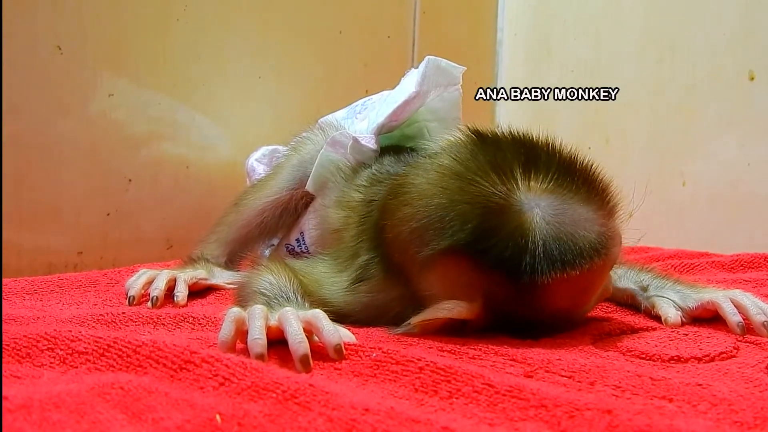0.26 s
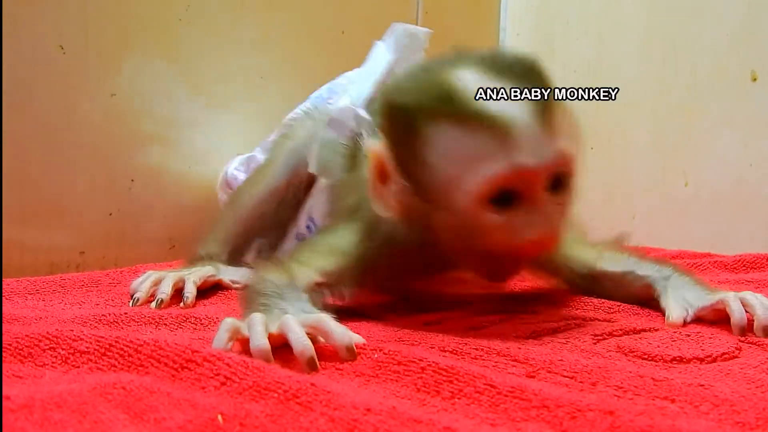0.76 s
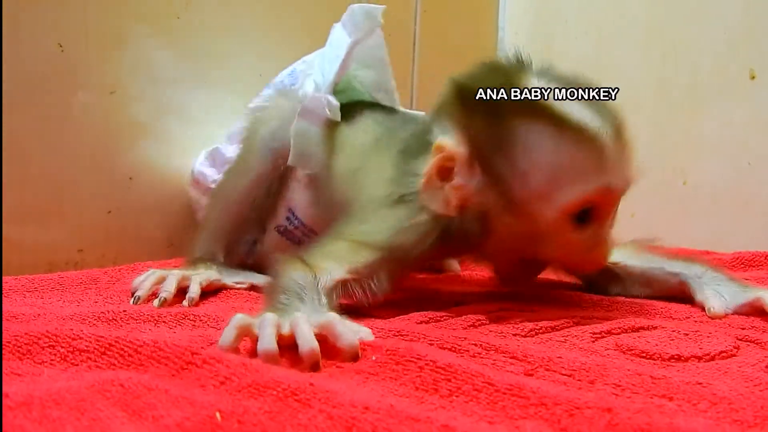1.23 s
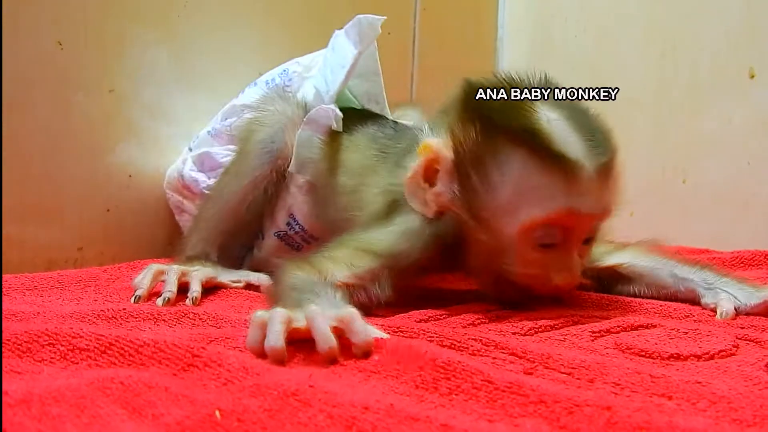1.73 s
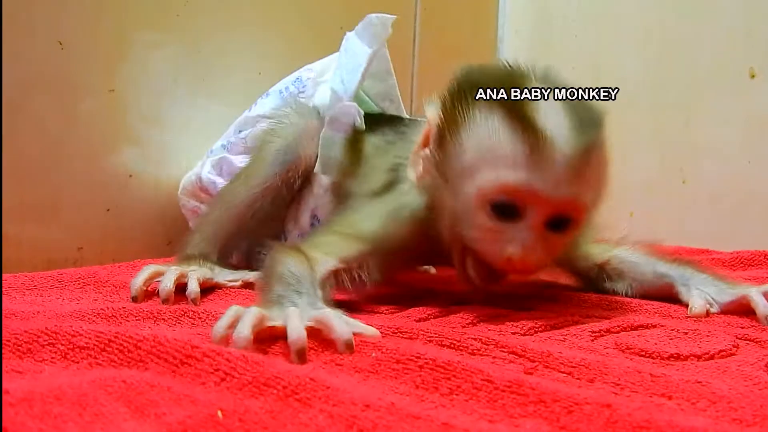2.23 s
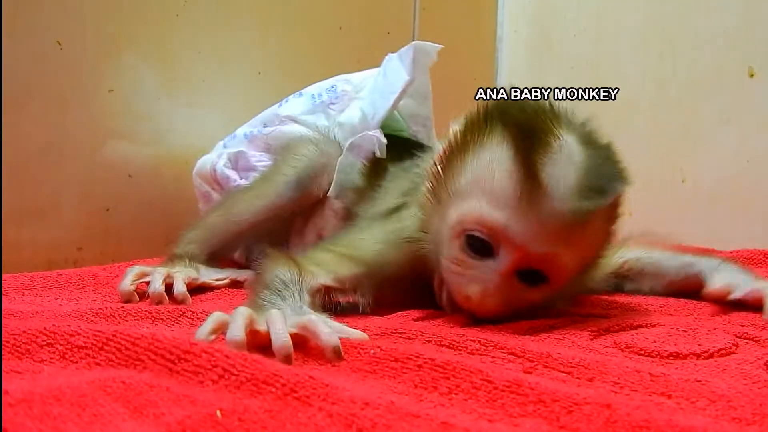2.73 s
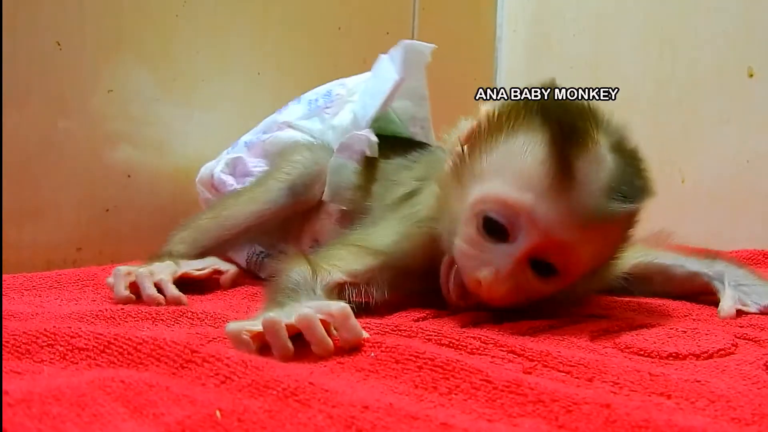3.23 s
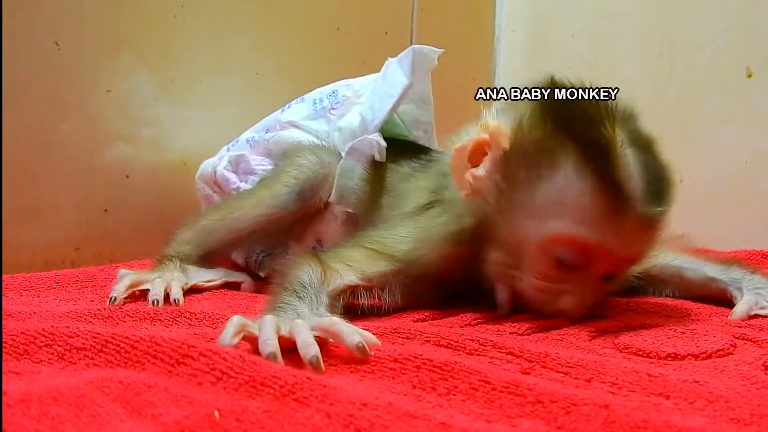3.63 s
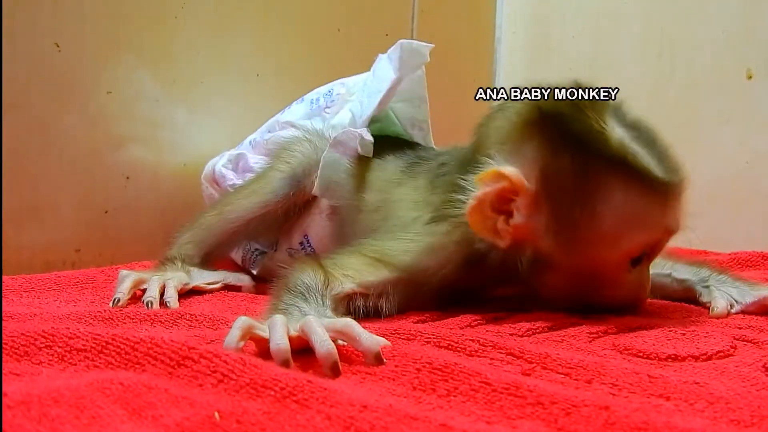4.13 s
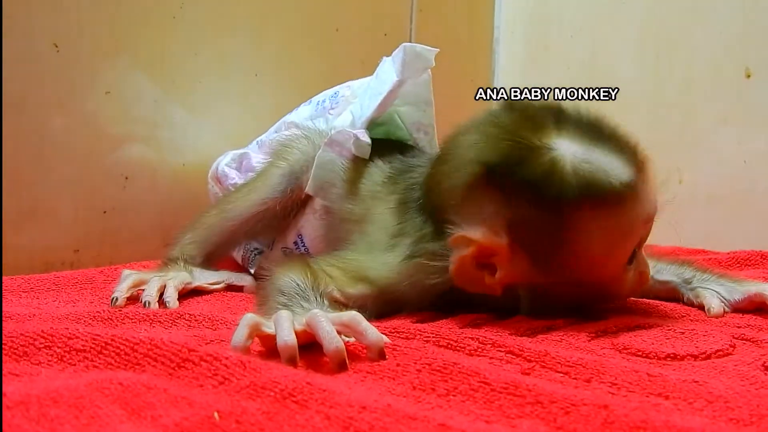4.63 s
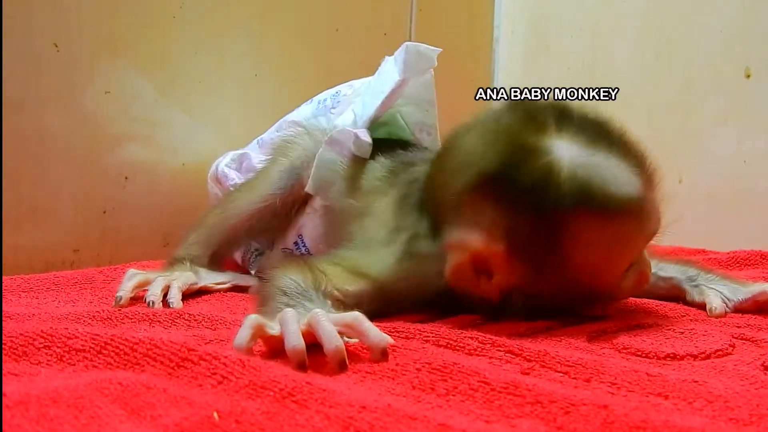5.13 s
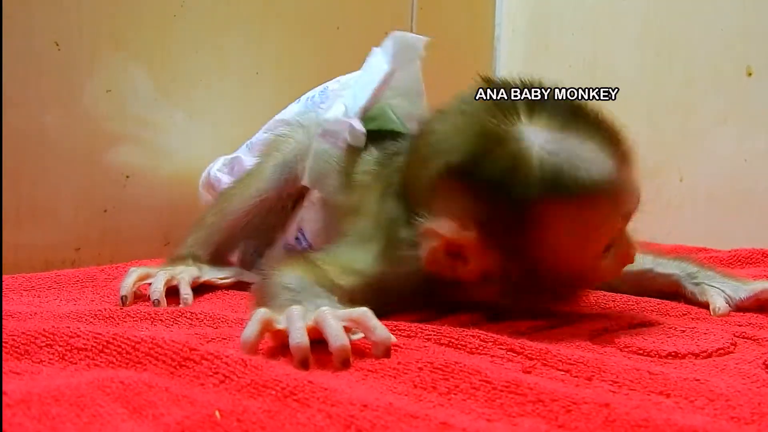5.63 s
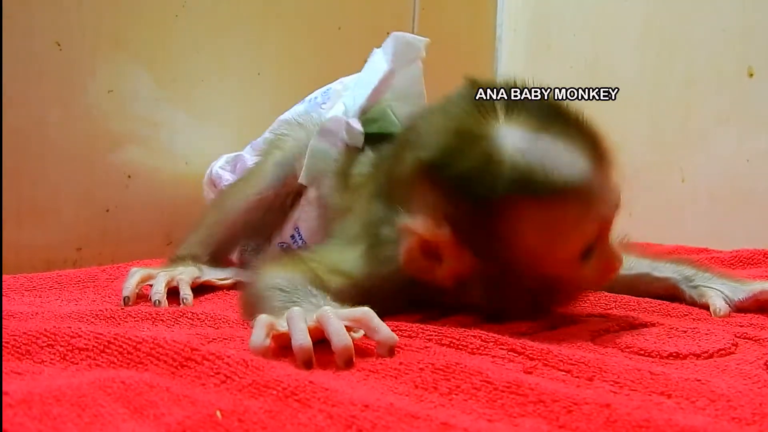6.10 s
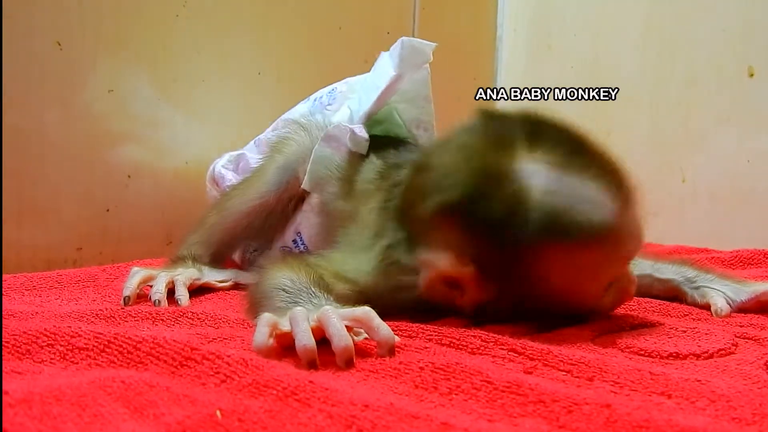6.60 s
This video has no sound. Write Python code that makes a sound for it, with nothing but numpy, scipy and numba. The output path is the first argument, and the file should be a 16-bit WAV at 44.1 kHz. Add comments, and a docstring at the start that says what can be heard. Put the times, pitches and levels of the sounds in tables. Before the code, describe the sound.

A baby monkey cries very close in a small hard-walled room. After half a second of quiet hum and hiss, eleven raspy shrieks follow with brief gaps, each starting as a dull yelp, opening into piercing treble and breaking up and down in pitch. Bright echoes fill the pauses, with faint soft bumps on padding. The microphone is near and loud peaks sound flattened.

```python
"""Screaming baby monkey

A baby monkey screams eleven times, close by, in a small hard-walled room.
Each scream starts with a dull yelp, then moves between thin upward climbs and hard pushes that sag in pitch.
Vocal fold harmonics and pulsed noise sound through the throat and through a mouth resonance that rises as it opens.
Echoes of decaying noise ring on over a low hum, faint noise hiss, thin whistles and a few soft bumps.
The recorder's gain control flattens the peaks, and a steep filter cuts the top treble."""
import sys
import numpy as np
from scipy import signal
from scipy.fft import rfft, irfft, next_fast_len
from scipy.io import wavfile
from scipy.ndimage import uniform_filter1d
from numba import njit

SR = 44100
rng = np.random.default_rng(int(sys.argv[2]) if len(sys.argv) > 2 else 0)


def to_wav(s):
    """Save 16-bit WAV."""
    ch = np.atleast_2d(s).T  # columns
    pcm = np.round(np.clip(ch, -1, 1) * 32767)  # PCM
    wavfile.write(sys.argv[1], SR, pcm.astype(np.int16))


N = 302526  # length in samples

CUTOFF_HZ = 15750  # top of the voice and of the recorder


def from_db(db):
    """Turn decibels into a gain."""
    return 10 ** (np.asarray(db) / 20)


def rms_one(x):
    """Scale a sound to an average power of 1."""
    return x / np.sqrt(np.mean(x ** 2) + 1e-20)


def evened(x, size=441):
    """Hold the short-term level at 1, averaging the power over size samples."""
    power = np.abs(uniform_filter1d(x * x, size))
    return x / np.sqrt(power + 1e-12)


def glide(x, seconds):
    """Round off the steps of a control with a moving average."""
    return uniform_filter1d(x, max(int(seconds * SR), 1), mode="nearest")


def flutter(size, rate_hz):
    """Random motion of spread 1, up to about rate_hz, from low-passed noise."""
    r = np.exp(-2 * np.pi * rate_hz / SR)
    noise = rng.standard_normal(2 * size)
    # the first half lets the filter settle
    return rms_one(signal.lfilter([1], [1, -2 * r, r * r], noise)[size:])


def butter(x, hz, kind, order=2):
    """Butterworth filter that only looks back in time."""
    return signal.sosfilt(signal.butter(order, hz, kind, fs=SR, output="sos"), x)


def at_hz(points, hz):
    """Read a curve of (Hz, value) points on a log-frequency axis."""
    f, value = np.transpose(points)
    return np.interp(np.log(np.maximum(hz, 1)), np.log(f), value)


def coloured(x, spectrum):
    """Give a sound a spectral shape."""
    size = next_fast_len(x.shape[-1] + 512)
    gain = from_db(at_hz(spectrum, np.fft.rfftfreq(size, 1 / SR)))
    return irfft(rfft(x, size) * gain, size)[..., :x.shape[-1]]


def diffuse(size):
    """Stereo noise as if from all sides: alike in the bass, less so in the treble."""
    # likeness of the two channels: pitch_hz [Hz], correlation [0-1]
    likeness = [(100, 1), (350, 0.98), (750, 0.96), (1400, 0.9), (2800, 0.86), (5000, 0.47), (14000, 0.14)]
    alike = np.clip(at_hz(likeness, np.fft.rfftfreq(size, 1 / SR)), 0, 1)
    mid, side = rfft(rng.standard_normal((2, size)))
    shared = np.sqrt(1 + alike) * mid
    opposed = np.sqrt(1 - alike) * side * [[1], [-1]]
    return irfft(shared + opposed, size) / np.sqrt(2)


def background(room_db=-48.5, low_cut_hz=39):
    """Steady room tone of shaped noise, with a hum whose strength wavers at random."""
    # colour of the room tone: pitch_hz [Hz], relative level_db [dB per Hz]
    room_colour = [(18, -54), (30, -15), (59, -10.5), (92, -3.5), (288, -14.5), (328, -6), (355, -13.5),
                   (629, -14.5), (698, -14.5), (1300, -16.5), (1520, -14), (2770, -20.5), (6700, -22),
                   (8690, -39.5), (15000, -60)]
    # low room hum: pitch_hz [Hz], width_hz [Hz], level_db [dB before the recorder]
    hum_tones = [(97.8, 11.1, -54)]
    t = np.arange(N) / SR
    hum = 0
    for hz, width_hz, db in hum_tones:
        tone = np.sqrt(2) * np.sin(2 * np.pi * hz * t)
        hum = hum + from_db(db) * flutter(N, width_hz / 2) * tone
    room_tone = butter(coloured(diffuse(N), room_colour), low_cut_hz, "high", order=4)
    return from_db(room_db) * rms_one(room_tone) + hum


def bumps(low_hz=105, high_hz=205, swell_s=0.012):
    """The monkey's body drops onto the padded bed: dull thuds of low noise that swell and die away."""
    # soft bumps: start_s [s], level_db [dB before the recorder]
    bump_times = [(1.0, -47), (2.39, -47), (2.655, -34), (2.915, -49), (3.005, -47.5)]
    t = np.arange(N) / SR
    level = 0
    for start, db in bump_times:
        age = np.maximum(t - start, 0) / swell_s
        level = level + from_db(db) * age * np.exp(1 - age)
    return level * rms_one(butter(rng.standard_normal(N), [low_hz, high_hz], "band"))


def thin_tones(waver=0.016):
    """Faint whistles: sine tones of wavering pitch that swell and fade."""
    # thin tones: start_s [s], end_s [s], pitch_hz [Hz], peak level_db [dB before the recorder]
    whistles = [(1.635, 1.785, 1897, -46), (1.652, 1.79, 1370, -52), (5.516, 5.618, 1870, -55),
                (6.4, 6.492, 1880, -49)]
    t, out = np.arange(N) / SR, np.zeros(N)
    for start, end, hz, db in whistles:
        on = (t > start) & (t < end)
        phase = 2 * np.pi * np.cumsum(hz * (1 + waver * flutter(on.sum(), 83))) / SR
        swell = np.sin(np.pi * (t[on] - start) / (end - start))
        out[on] += from_db(db) * np.sqrt(2) * swell * np.sin(phase)
    return out


def in_room(x, wet_db=-2.5, first_echo_s=0.0016, build_s=0.0008):
    """Direct sound plus dense wall echoes, drawn afresh on each call, dying at a rate set by frequency."""
    # the room's ring: pitch_hz [Hz], time to fall by 60 dB [s]
    ring = [(700, 0.28), (2000, 0.47), (6000, 0.5), (9000, 0.44), (14000, 0.27)]
    size = 2 ** 15
    t, hz = np.arange(size) / SR, np.fft.rfftfreq(size, 1 / SR)
    field = rfft(diffuse(size))
    echoes = 0
    for k, (_, t60) in enumerate(ring):
        # each band fades over into its neighbours
        band = at_hz([(f, j == k) for j, (f, _) in enumerate(ring)], hz)
        echoes = echoes + irfft(field * band, size) * np.exp(-np.log(1000) * t / t60)
    build = np.clip((t - first_echo_s) / build_s, 0, 1)
    response = from_db(wet_db) * rms_one(echoes * build) / np.sqrt(size)
    response[:, 0] += 1  # the direct sound
    return signal.fftconvolve(x[None], response, axes=1)


# yelp, climb and push each return:
# pitch, roughness, push strength, shrill level, low level, mouth swing
def yelp(t, hz, rough, shrill_db, low_db, droop_per_s=4.65):
    """The brief opening yelp, drooping a little in pitch."""
    return hz * np.exp(-droop_per_s * t), rough, 0, shrill_db, low_db, 0


def climb(t, first_hz, last_hz, rough, shrill_db, low_db, fade_db, thinning_share=0.33):
    """The pitch glides up evenly while the mouth widens and the fade acts, less on the shrill layer."""
    u = t / t[-1]
    pitch = first_hz * (last_hz / first_hz) ** u
    return pitch, rough, 0, shrill_db - thinning_share * fade_db * u, low_db - fade_db * u, u - .5


def push(t, first_hz, last_hz, rough, push_db, crest, shrill_db, low_db,
         sag_power=1.7, fray=0.11, crest_fullness=1.27, end_fade_db=3):
    """A burst of lung pressure: pitch and mouth sag ever faster and the voice frays as it gives out."""
    u = t / t[-1]
    sag = u ** sag_power
    # the pressure stays near the crest for a while
    pressure = np.minimum(crest_fullness * np.interp(u, [0, min(crest, 1), 1], [0, 1, 0]), 1)
    fade_db = end_fade_db * (sag - .5)
    pitch = first_hz + (last_hz - first_hz) * sag
    roughness = rough + fray * (sag - .5)
    return pitch, roughness, push_db * pressure, shrill_db - fade_db, low_db - fade_db, .5 - sag


def controls(t, start, end, yelp_row, break_s=.003, effort_glide_s=0.011):
    """Join one scream's yelp, climbs and pushes into smooth controls, each move lasting until the next."""
    # climbs, base values: start_s [s], first pitch_hz [Hz], last pitch_hz [Hz], roughness [0-1],
    # shrill level_db [relative dB], low tone level_db [relative dB], fade_db [dB]
    climb_rows = [ (.568, 827, 1814, 0.02, -39, -26, 2), (.617, 1802, 1896, 0.03, -26.5, -15, 27),
                  (.647, 2070, 2182, 0.35, -24, -42, 24), (0.733, 1150, 1400, 0.65, -23, -34.5, 20),
                  (1.067, 1049, 1462, 0.55, -17, -30, 14), (1.086, 1906, 2303, .55, -21, -59, 16),
                  (1.165, 1187, 1600, 0.41, -20.5, -40, 12), (1.276, 1193, 1493, 0.41, -22, -33, 48),
                  (1.843, 1553, 2326, .3, -20, -46, 57), (1.948, 1231, 1592, .62, -19.5, -42, 11),
                  (2.051, 1750, 2434, .36, -17.5, -37, 20), (2.18, 2016, 2718, .24, -21, -34, 64),
                  (2.592, 1013, 1142, 0.5, -18.5, -35, 20), (2.703, 1349, 2036, 0.15, -19, -35, 20),
                  (2.813, 1208, 2009, 0.41, -21, -33.5, 12), (2.848, 1993, 2936, .24, -26, -27, 34),
                  (3.251, 760, 1108, 0.32, -18, -30.5, 16), (3.373, 1405, 2100, .35, -23.5, -31, 13),
                  (3.503, 1160, 1378, 0.51, -20.5, -36, -6), (3.808, 690.4, 1417, .48, -18, -29, 44),
                  (3.933, 1250, 2257, 0.43, -13, -22, 29), (4.06, 1240, 1380, 0.41, -23, -27.5, 4.5),
                  (4.365, 974.5, 1383, 0.33, -20, -27, 16), (4.489, 1196, 1994, 0.4, -18.5, -22.5, 34),
                  (4.984, 941.7, 1394, 0.62, -18.5, -23, 29), (5.112, 1106, 1343, 0.54, -24.5, -29, 20),
                  (5.25, 1256, 1323, 0.69, -28.5, -27.5, 5), (5.625, 1153, 1360, 0.71, -22, -30, 21),
                  (6.058, 1175, 1364, .42, -24.5, -24.5, 17.5), (6.197, 1157, 1246, 0.54, -31, -28, 4.5),
                  (6.523, 994, 1388, 0.46, -21, -34, 8), (6.642, 1146, 1502, 0.59, -30, -24.5, 8.5)]
    # pushes, base values: start_s [s], first pitch_hz [Hz], last pitch_hz [Hz], roughness [0-1],
    # push strength [dB, each layer takes a share], crest [share of the length],
    # shrill level_db [relative dB], low tone level_db [relative dB]
    push_rows = [ (.69, 1073, 763, 0.39, 5.5, 0.6, -21.5, -28.5),
                 (.825, 1080, 604.5, 0.35, 3, 0.32, -24, -26.5),
                 (1.112, 883, 619, 0.44, 2.5, 0.29, -20, -28),
                 (1.235, 1058, 794, 0.34, 4.5, 0.39, -27.5, -29.5),
                 (1.395, 1381, 780, 0.34, 1.5, 0.14, -19.5, -30.5),
                 (1.898, 880.6, 676.3, .34, 9, 0.48, -24.5, -31),
                 (2.005, 1010, 781, 0.47, 5, 0.55, -30, -35), (2.12, 1109, 858, 0.51, 6, 0.34, -26, -33.5),
                 (2.296, 1230, 683.5, .2, 2.5, .33, -22, -34),
                 (2.645, 975, 625.4, 0.59, 18.5, 0.77, -24.5, -35),
                 (2.755, 1091, 819.4, 0.35, 8.5, 1, -25.5, -37.5),
                 (2.92, 1103, 554.6, 0.27, 6, 0.4, -25, -35.5),
                 (3.29, 1069, 657.7, .34, 3.5, 0.28, -20.5, -33.5),
                 (3.435, 1090, 788.5, 0.23, 1.5, 0.6, -24.5, -33.5),
                 (3.88, 1051, 675, 0.29, 13.5, 0.65, -33.5, -37),
                 (4.015, 1072, 933, .22, 3.5, 0.91, -24, -32),
                 (4.425, 1112, 653.6, 0.54, 12, 0.72, -28, -36),
                 (4.57, 1331, 716.6, .32, 1.5, 0.54, -21, -29),
                 (5.06, 1137, 778, .38, 15.5, 0.58, -24.5, -33.5),
                 (5.195, 1088, 876.5, 0.45, 5, 0.87, -21, -30),
                 (5.72, 1360, 608.5, 0.24, 13.5, 0.39, -30, -39),
                 (6.13, 1132, 669, 0.34, 11, 0.65, -24.5, -37.5),
                 (6.58, 1036, 690, 0.28, 15.5, 0.55, -23.5, -33)]
    moves = []
    for move, table in ((climb, climb_rows), (push, push_rows)):
        moves += [(s, move, row) for s, *row in table if start < s < end]
    moves = [(start, yelp, yelp_row)] + sorted(moves, key=lambda m: m[0])
    pieces = np.split(t, np.searchsorted(t, [m[0] for m in moves[1:]]))
    joined = []
    for part, (_, move, row) in zip(pieces, moves):
        joined.append(np.broadcast_arrays(*move(part - part[0], *row)))
    pitch, *effort = np.hstack(joined)
    # the pitch breaks faster than the effort can change
    return [glide(pitch, break_s)] + [glide(c, effort_glide_s) for c in effort]


def folds(pitch, rough, push_db, jitter=0.14, quaver=0.02, crack=.08, cracks_per_s=60, flicker_db=5,
          steady_below=0.2, rasp=1.3, rasp_per_db=0.11, shimmer=0.47, doubling=0.84):
    """Vocal fold harmonics: roughness shakes period and strength, and with pressure adds pulsed turbulence."""
    size, chaos = len(pitch), rough ** 2
    # the pitch cracks to a new value at random moments
    crack_count = np.cumsum(rng.random(size) < cracks_per_s / SR)
    jumps = rng.standard_normal(size)[crack_count]
    shake = quaver * flutter(size, 77.2) + rough * crack * jumps + chaos * jitter * flutter(size, 414)
    hz = pitch * (1 + shake)
    phase = 2 * np.pi * np.cumsum(hz) / SR
    # each overtone flickers on its own; the lowest harmonic does not
    unsteady_db = flicker_db * np.minimum(rough / steady_below, 1)
    tone = 0
    for k in range(1, 22):
        below_cutoff = np.clip((CUTOFF_HZ - k * hz) / hz, 0, 1)
        flicker = from_db((k > 1) * unsteady_db * flutter(size, 22.2))
        tone = tone + np.sin(k * phase) * below_cutoff * flicker
    # strained folds alternate strong and weak cycles
    alternation = doubling * flutter(size, 48) * np.cos(phase / 2)
    tone = evened(tone) * (1 + rough * (shimmer * flutter(size, 360) + alternation))
    # noise that pulses once per cycle
    turbulence = butter(rng.standard_normal(size), 2620, "high") * (1 + np.cos(phase))
    return tone + (rasp * chaos + rasp_per_db * push_db) * turbulence


@njit
def moving_filter(x, hz, damping):
    """Two-pole resonance with a moving centre; returns its low-pass and band-pass outputs."""
    low, band, a, b = np.zeros(len(x)), np.zeros(len(x)), 0., 0.
    for i in range(len(x)):
        g = np.tan(np.pi * hz[i] / SR)
        band[i] = (a + g * (x[i] - b)) / (1 + g * (g + damping))
        low[i] = b + g * band[i]
        a, b = 2 * band[i] - a, 2 * low[i] - b
    return low, damping * band


def mouth(x, centre_hz, push_db, opening, sharpness=2.8, bypass=0.17, yelp_edge_hz=3600,
          edge_ratio=1.575, edge_hz_per_db=140, leak_db=-29, leak_per_db=12.5, gape_hz=6000,
          leak_hz_per_db=350):
    """A resonance under a steep edge; pushing raises the edge, and with a wide mouth lets more treble through."""
    open_edge_hz = np.maximum(edge_ratio * centre_hz, gape_hz) + edge_hz_per_db * push_db
    edge_hz = np.clip(yelp_edge_hz + opening * (open_edge_hz - yelp_edge_hz), 1000, CUTOFF_HZ)
    resonance = moving_filter(x, np.minimum(centre_hz, edge_hz), 1 / sharpness)[1]
    x = resonance + bypass * x
    muffled = x
    # four two-pole stages make one steep Butterworth edge
    for angle in np.pi * np.array([1, 3, 5, 7]) / 16:
        muffled = moving_filter(muffled, edge_hz, 2 * np.cos(angle))[0]
    pushed_leak_db = np.minimum(leak_db + leak_per_db * push_db, -3)
    leak = opening * from_db(pushed_leak_db + (centre_hz - gape_hz) / leak_hz_per_db)
    return evened(muffled + leak * x)


def mouth_resonance(t, start, end, open_hz, open_s, swing, push_db, shut_hz=2780, swing_share=0.3,
                    closing_share=0.22, closing_s=0.05, hz_per_push_db=42):
    """The resonance rises as the mouth opens, swings with each move, drops at the end and rises with pressure."""
    opening_hz = open_hz + (shut_hz - open_hz) * np.exp((start - t) / open_s)
    closing = 1 - closing_share * np.exp((t - end) / closing_s)
    return opening_hz * (1 + swing_share * swing) * closing + hz_per_push_db * push_db


def scream(start, end, yelp_row, open_hz, open_s, push_shrill=0.63, push_low=0.49, shrill_db=-1.5,
           low_db=0.0, attack_s=0.0026, release_s=.02, throb_db=3.5, lips_delay_s=0.0093, lips_share=0.34):
    """One scream: the folds sound through the throat and through the opening mouth."""
    # colour of the shrill overtones: pitch_hz [Hz], relative level_db [dB]
    overtone_colour = [(1300, -95), (2100, -19.5), (2650, -5.5), (3300, -4.5), (4700, -5), (6500, 2),
                       (7600, -3), (9000, -11), (11000, -15.5), (15000, -31.5)]
    # colour of the throat, with its low resonances: pitch_hz [Hz], relative level_db [dB]
    throat_colour = [(430, -47), (620, 0), (820, 0.5), (1200, 3.5), (1480, -5.5), (1950, 0), (2300, -4),
                     (2900, -38.5), (4000, -54), (12000, -45.5)]
    t = np.arange(int(start * SR), int(end * SR)) / SR
    pitch, rough, push_db, overtones_db, tone_db, swing = controls(t, start, end, yelp_row)
    mouth_hz = mouth_resonance(t, start, end, open_hz, open_s, swing, push_db)
    source = folds(pitch, np.clip(rough, 0, 1), push_db)
    # the lips part only after a moment, so each scream starts as a dull yelp
    opening = np.clip((t - start - lips_delay_s) / (lips_share * open_s), 0, 1)
    shrill = mouth(coloured(source, overtone_colour), mouth_hz, push_db, opening)
    shrill = shrill * from_db(overtones_db + shrill_db + push_shrill * push_db)
    low = evened(coloured(source, throat_colour)) * from_db(tone_db + low_db + push_low * push_db)
    # the lung pressure throbs in the shrill layer; both layers die away at the end
    shrill = shrill * from_db(throb_db * flutter(len(t), 42.0))
    gate = np.clip(np.minimum((t - start) / attack_s, (end - t) / release_s), 0, 1)
    return (low + shrill) * np.sin(np.pi / 2 * gate) ** 2


def scene(voice_db=-0.5):
    """The monkey, a little to the right, in its room."""
    # screams and their yelps, base values: start_s [s], end_s [s], yelp pitch_hz [Hz],
    # yelp roughness [0-1, clipped], yelp shrill level_db [relative dB],
    # yelp low tone level_db [relative dB], open mouth resonance_hz [Hz], opening time_s [s]
    scream_rows = [ (0.554, 0.891, 765, 0.13, -64, -37, 5200, 0.097),
                   (1.056, 1.45, 1614, .35, -27.5, -25, 6060, 0.015),
                   (1.832, 2.359, 1699, 0.57, -43, -38, 5830, 0.004),
                   (2.58, 2.99, 1729, 0.28, -22, -32, 5650, 0.0093),
                   (3.236, 3.544, 1544, 0.25, -31, -34.5, 5600, 0.014),
                   (3.792, 4.111, 1709, 0.5, -24, -41, 5340, 0.014),
                   (4.352, 4.658, 1151, 0.73, -43, -26.5, 5250, 0.049),
                   (4.967, 5.296, 1147, 0.64, -35, -27.5, 4580, .09),
                   (5.61, 5.813, 1196, 0.89, -29.5, -22, 4200, 0.066),
                   (6.041, 6.264, 962, 0.75, -46, -28.5, 4650, 0.098),
                   (6.502, 6.739, 978.5, 1.02, -29.5, -23, 4400, 0.14)]
    voice = np.zeros((2, N))
    for start, end, *yelp_row, open_hz, open_s in scream_rows:
        at = int(start * SR)
        sound = in_room(scream(start, end, yelp_row, open_hz, open_s))[:, :N - at]
        voice[:, at:at + sound.shape[1]] += sound
    place = from_db([[-.9], [0]])  # left, right
    return from_db(voice_db) * place * voice + thin_tones() + bumps() + background()


def gain_control(x, threshold_db=-23.5, squeeze=1.0, recovery_db_per_s=120, size=110):
    """The gain drops quickly on loud sound and creeps back."""
    power = np.abs(uniform_filter1d(np.mean(x ** 2, axis=0), size))
    over = np.maximum(10 * np.log10(power + 1e-12) - threshold_db, 0)
    # hold each peak, letting it fall at the recovery rate
    ramp = recovery_db_per_s * np.arange(N) / SR
    held_db = np.maximum.accumulate(over + ramp) - ramp
    return x * from_db(-np.clip(squeeze, 0, 1) * uniform_filter1d(held_db, size))


def record(dry, makeup_db=3.5):
    """The recorder: gain control, a fixed boost, then a steep top cut."""
    top_cut = signal.ellip(10, .1, 90, CUTOFF_HZ, fs=SR, output="sos")
    return signal.sosfilt(top_cut, from_db(makeup_db) * gain_control(dry))


dry = scene()
out = record(dry)
to_wav(out)
```